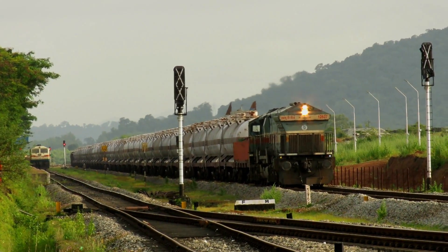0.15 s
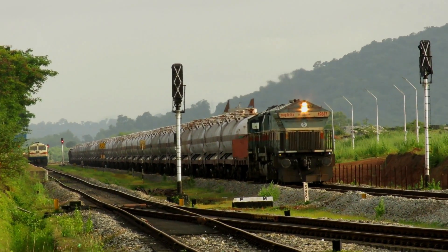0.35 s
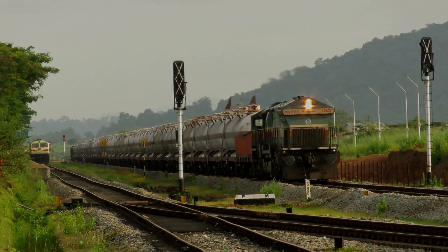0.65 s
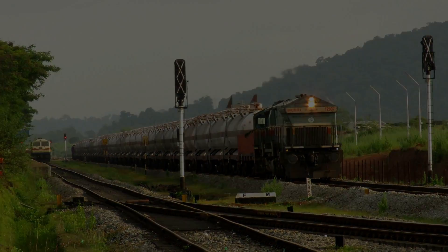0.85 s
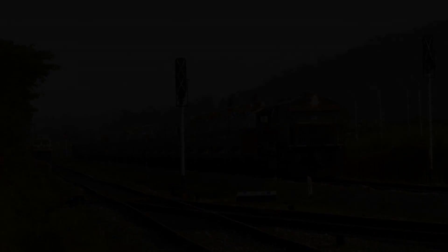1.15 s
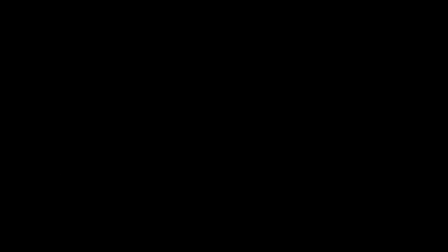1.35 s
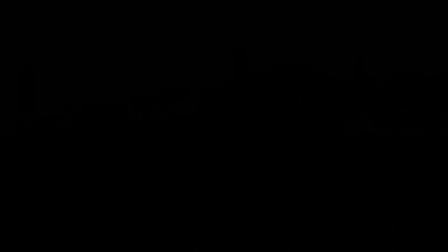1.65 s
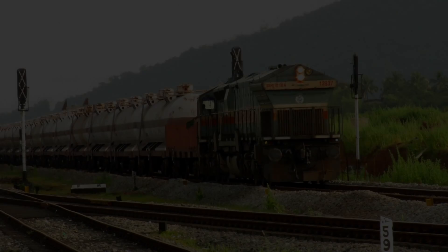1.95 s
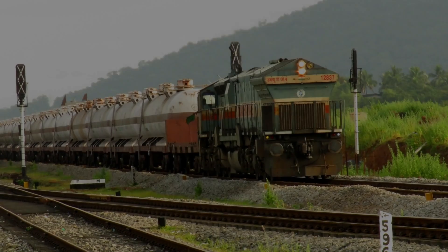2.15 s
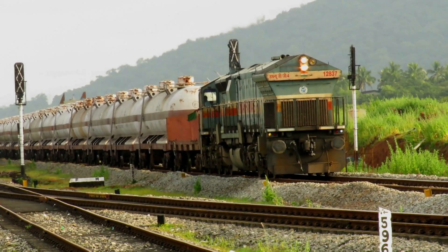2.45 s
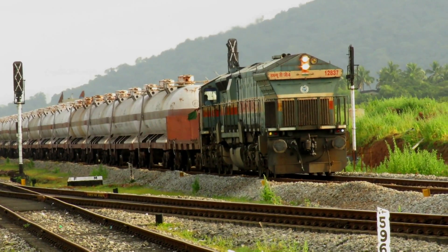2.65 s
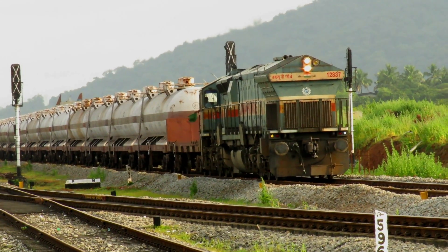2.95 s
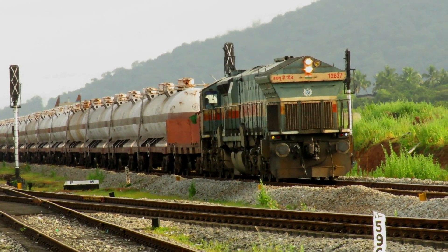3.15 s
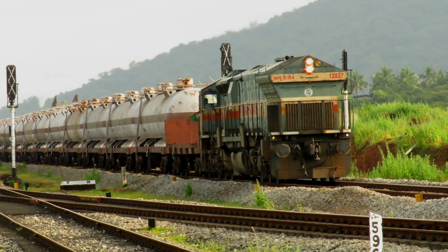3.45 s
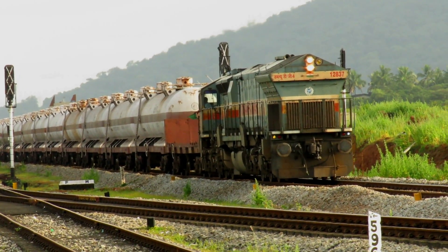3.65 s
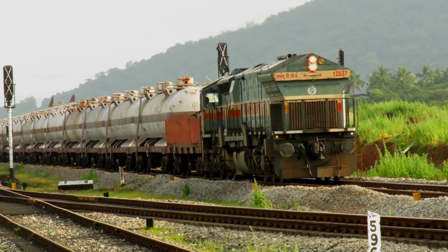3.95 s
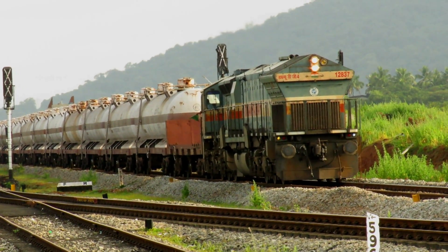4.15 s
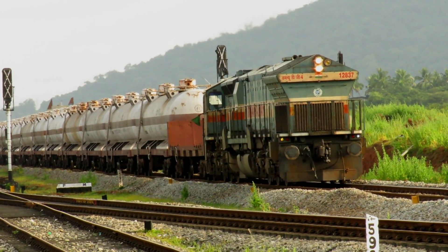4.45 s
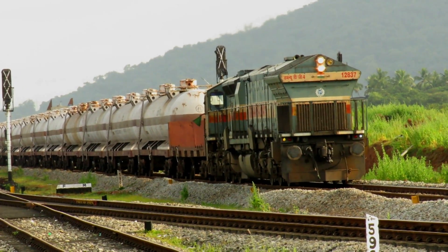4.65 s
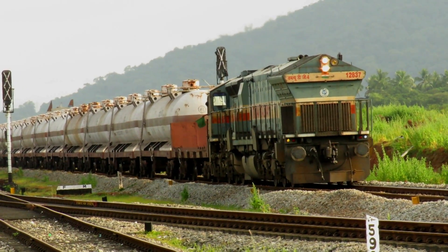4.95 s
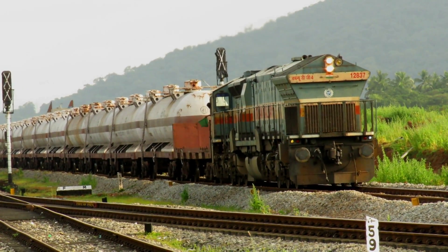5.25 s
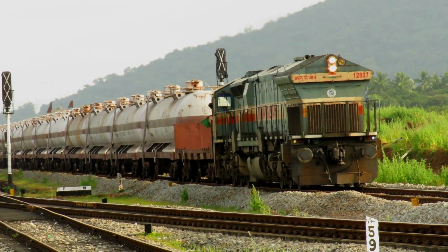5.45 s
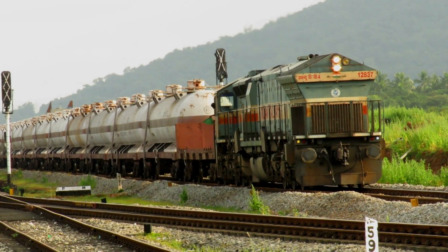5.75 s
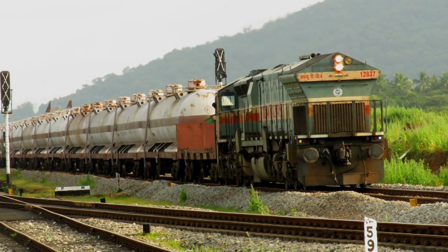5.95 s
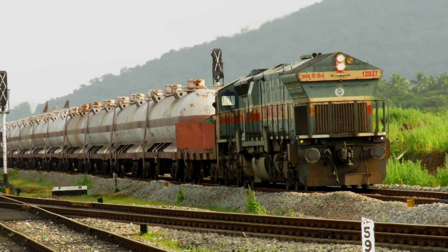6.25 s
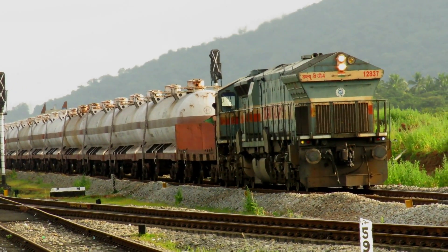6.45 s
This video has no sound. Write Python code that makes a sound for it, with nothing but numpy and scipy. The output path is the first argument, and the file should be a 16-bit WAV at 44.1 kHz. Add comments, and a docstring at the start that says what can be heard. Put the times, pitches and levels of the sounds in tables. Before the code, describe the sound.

A diesel locomotive throbs and clatters as it slowly hauls a freight train closer, with a whine rising near the end.

```python
"""Freight train across open ground

A two-stroke diesel locomotive hauls a freight train slowly towards a stereo microphone. Its exhaust
throbs and its cylinders clatter in a pattern that repeats with every crank turn; gears and
turbocharger whine, wheels hiss and loose fittings rattle. A distant position, with a gust of wind
on the microphone, dissolves into a nearer one, where the engine takes on load near the end."""
import sys
import numpy as np
from scipy import signal
from scipy.fft import rfft, irfft, next_fast_len
from scipy.io import wavfile
from scipy.ndimage import uniform_filter1d

SR = 44100
rng = np.random.default_rng(int(sys.argv[2]) if len(sys.argv) > 2 else 0)


def pcm_store(signal):
    """Save signal as 16-bit PCM."""
    levels = np.round(np.clip(np.atleast_2d(signal), -1, 1) * 32767)
    wavfile.write(sys.argv[1], SR, levels.astype(np.int16).T)


N = 291048
TIME, FREQS = np.arange(N) / SR, np.arange(N // 2 + 1) * SR / N
SIDES = np.array([[1], [-1]])  # left, right
DISSOLVE_START_S, DISSOLVE_LENGTH_S = .55, 1.7  # from the far position to the near one
LOAD_START_S, LOAD_RISE_S = 5.43, .27
FAR_WANDER_RAD, NEAR_WANDER_RAD = 1.1, .6  # tones wander more from afar, through more air


def from_db(db):
    """Decibels to gain."""
    return 10 ** (np.asarray(db) / 20)


def rms_one(x):
    """Scale to unit power."""
    return x / np.sqrt(np.mean(x ** 2) + 1e-20)


def in_time(rows):
    """Each column after the first, which is seconds, at every sample."""
    s, *columns = np.transpose(rows)
    return [np.interp(TIME, s, c) for c in columns]


def ramp(start_s, length_s):
    """A straight rise from 0 to 1."""
    return np.clip((TIME - start_s) / length_s, 0, 1)


def gains(points):
    """Rows of Hz and dB as a gain at every frequency."""
    hz, db = np.transpose(points)
    return from_db(np.interp(np.log(FREQS + 1e-3), np.log(hz), db))


def colour(x, points):
    """Shape x by a spectrum whose ends fall away; unit power."""
    skirts = 1 / (1 + (FREQS / points[-1][0]) ** 4) / (1 + (points[0][0] / (FREQS + 1e-3)) ** 4)
    return rms_one(irfft(rfft(x) * gains(points) * skirts, N))


def drift(rate_hz, step=40):
    """Slow random motion with spread 1, drawn every few samples and joined up."""
    size = next_fast_len(N // step + 2)
    hz = np.arange(size // 2 + 1) * SR / step / size
    slow = irfft(rfft(rng.standard_normal(size)) / (1 + (hz / rate_hz) ** 2), size)
    return np.interp(np.arange(N) / step, np.arange(size), rms_one(slow))


def tone(turns, order, wander, flutter_db, rough=0):
    """A sine at a multiple of a rotation, shaken by moving air; wander and rough are in radians."""
    phase = 2 * np.pi * (order * turns + rng.random()) + wander * drift(2.5)
    if rough:
        phase += rough * drift(35)
    return np.sqrt(2) * np.sin(phase) * from_db(flutter_db * drift(6))


def approach_s():
    """Seconds since the end of the dissolve, negative before it."""
    return TIME - DISSOLVE_START_S - DISSOLVE_LENGTH_S


def level(near, far_db, near_db, db_per_s, load_db):
    """Gain of a part: steady from afar; from nearby it follows the approach and the load."""
    if not near:
        return from_db(far_db)
    load = ramp(LOAD_START_S, LOAD_RISE_S)
    return from_db(near_db + db_per_s * np.maximum(approach_s(), 0) + load_db * load)


def outdoors(x, echo_s):
    """Direct sound at the microphone, plus a short spray of reflections off ground and cars."""
    # Each row: frequency in Hz, lead of the left channel in radians, left minus right in dB.
    stereo_image = [(60, 0, 0), (110, 0, -.2), (190, -.05, -1.3), (300, -.4, -2.5), (520, .6, -1),
                    (750, .35, 1.1), (1200, .5, 2.2), (1630, 1.1, 3), (2570, .9, -1), (4500, 0, 0)]
    # Each row: frequency in Hz, share that arrives scattered in dB.
    scatter = [(80, -32), (120, -22), (200, -16), (450, -12), (750, -19), (1150, -8), (1400, -13),
               (2000, -6)]
    hz, *columns = np.transpose(stereo_image)
    lead, balance_db = (np.interp(FREQS, hz, column) for column in columns)
    spray = rng.standard_normal(N) * np.exp(-TIME / echo_s) * (TIME < 10 * echo_s)
    scattered = gains(scatter) * rfft(spray) / np.sqrt(np.sum(spray ** 2))
    direct = from_db(SIDES * balance_db / 2) * np.exp(1j * SIDES * lead / 2)
    return irfft(rfft(x) * (direct + SIDES * scattered), N)


def hiss():
    """Wide, slightly unsteady hiss of air and rolling wheels, in which wheels and rails ring faintly."""
    # Each row: wheel or rail resonance in Hz, half width in Hz, dB relative to the hiss.
    rings = [(2090, 21, 1.5), (2620, 11, -2), (8480, 27, 0)]
    # Colour of the hiss. Each row: frequency in Hz, relative level in dB.
    spectrum = [(1500, 0.5), (2200, 4), (2600, 3), (3100, -0.5), (4800, -4.5), (6000, -8), (8400, -12),
                (9100, -13), (9700, -8.5), (10200, -12), (13000, -16), (16000, -19)]
    # Stereo width. Each row: frequency in Hz, side against mid in dB.
    side_gain = [(1500, -2.5), (2300, 5.5), (4400, 2.5), (6000, 0), (9000, 1), (11000, -19)]
    resonance = 1 + sum(from_db(db) / (1 + 1j * (FREQS - hz) / width) for hz, width, db in rings)
    rolling = irfft(rfft(rng.standard_normal((2, N))) * resonance, N)
    mid, side = colour(rolling, spectrum)
    side = irfft(rfft(side) * gains(side_gain), N)
    return (mid + side * SIDES) * from_db(.55 * drift(14))


def rattle(parts=48, touches_per_s=1000, t60_s=.035):
    """Loose fittings on the running gear: soft, uneven touches, each swelling briefly in one part."""
    # Colour of the rattle. Each row: frequency in Hz, gain in dB.
    spectrum = [(2200, 0), (2700, 0), (3300, -2), (4800, -2.5), (6000, -6), (7500, -9)]
    out = np.zeros((2, N))
    for hz in np.geomspace(2100, 7500, parts):
        when, force, place = rng.random((int(touches_per_s * N / SR / parts), 3)).T
        pan = np.array([np.cos(2 * np.pi * place), np.sin(2 * np.pi * place)])
        touches = np.full((2, N), 1e-18)
        touches[:, (when * N).astype(int)] = from_db(10 * force) * pan
        radius = from_db(-60 / (t60_s * SR))
        angle = 2 * np.pi * hz * (1 + .02 * rng.random()) / SR
        resonator = [0, np.sin(angle), 0.0036, 1, -2 * radius * np.cos(angle), radius * radius]
        out += signal.sosfilt([resonator] * 2, touches)  # two in series soften the attack
    return colour(out, spectrum)


def wind(low_cut_hz=38):
    """Wind on the microphone: dull eddies, brighter lumps as a puff hardens, single pressure kicks."""
    # Each row: crest of a puff in seconds, half length in seconds, level in dB.
    puffs = [(0.21, 0.087, -44), (0.566, 0.16, -40), (0.814, 0.04, -34.5), (0.914, 0.025, -34.5),
             (1.11, 0.13, -38), (1.35, 0.11, -39)]
    # Each row: moment of a sharp buffet in seconds, half width in seconds, strength in dB.
    buffets = [(.2, .0012, -27), (.46, .0012, -27), (.606, .0012, -23), (.714, .0025, -23),
               (.774, .0009, -24), (.784, .0012, -25), (.804, .0011, -21), (.813, .001, -24),
               (.837, .0012, -22.5), (.887, .0012, -22), (.897, .0015, -21), (.907, .0012, -21),
               (1.011, .0009, -24), (1.085, .0018, -20.5), (1.095, .0009, -23.5), (1.132, .0008, -21),
               (1.162, .001, -21), (1.214, .001, -24), (1.288, .001, -23), (1.428, .0012, -22)]
    # Colours of the lumps and of the eddies. Each row: frequency in Hz, relative level in dB.
    lump_spectrum = [(30, -22.5), (60, 8.5), (100, -1), (170, 2.5), (300, -6), (420, -14), (600, -20.5),
                     (1200, -36.5)]
    eddy_spectrum = [(40, -24), (70, -13), (110, -3), (190, -6), (260, -8.5), (400, -24.5)]
    power = sum(from_db(db) ** 2 * np.exp(-((TIME - s) / length) ** 2) for s, length, db in puffs)
    gust_db = 10 * np.log10(power + 1e-12)
    lump_db = gust_db + .35 * (gust_db - gust_db.max())  # lumps grow faster than the puff
    lump_gain = from_db(lump_db) * rms_one(from_db(2.3 * drift(86)))
    eddy_gain = from_db(gust_db * .5 - 21.5) * np.clip((gust_db + 63) / 10, 0, 1)
    lumps = colour(rng.standard_normal((2, N)), lump_spectrum) * lump_gain
    eddies = colour(rng.standard_normal((2, N)), eddy_spectrum) * eddy_gain
    mid, side = lumps + eddies
    for s, width_s, db in buffets:
        age = (TIME - s) / width_s
        mid = mid + from_db(db) * age * np.exp(-age ** 2)
    pressure = mid + from_db(-11.5) * side * SIDES
    return irfft(rfft(pressure) * FREQS ** 4 / (FREQS ** 4 + low_cut_hz ** 4), N)


def squeals():
    """Faint, thin whistles, probably from the wheels, that swell and die away."""
    # Each row: crest in seconds, half length in seconds, pitch in Hz, level in dB.
    whistles = [(2.1, .2, 4820, -92), (5.08, .14, 4815, -96), (5.8, .27, 4615, -90)]
    return sum(from_db(db) * np.exp(-((TIME - s) / length) ** 2)
               * tone(TIME, hz, wander=1.7, flutter_db=5, rough=1.2) for s, length, hz, db in whistles)


def turbocharger():
    """A thin, flickering whistle that only carries a short way and sags under load."""
    # Each row: time in seconds, pitch in Hz, level in dB.
    whistle = [(1.4, 5452, -105), (2, 5452, -93), (2.42, 5452, -84), (2.8, 5452, -91), (2.97, 5452, -83),
               (3.15, 5452, -85), (3.42, 5452, -92), (3.9, 5452, -86), (4.5, 5452, -97), (5, 5450, -96),
               (5.25, 5435, -90), (5.55, 5420, -90), (5.7, 5410, -82.5), (5.8, 5405, -89),
               (5.95, 5400, -86), (6.2, 5395, -91)]
    hz, db = in_time(whistle)
    flicker = from_db(db + 3 * drift(25))
    return flicker * tone(np.cumsum(hz) / SR, 1, wander=1.2, flutter_db=.8, rough=.75)


def sinking_hum(pitch_hz=171.8, sink_hz_per_s=7.3):
    """Three partials, probably the traction gears, gliding down through pitch_hz as the dissolve ends."""
    # Each row: multiple of the pitch, level in dB.
    partials = [(1, -53.5), (2, -53), (3, -62)]
    # The hum is clearest midway. Each row: time in seconds, gain in dB.
    swell = [(1.5, -3), (3.1, -4), (3.6, 1), (4.4, -1), (6.6, -3)]
    cycles = np.cumsum(pitch_hz - sink_hz_per_s * approach_s()) / SR
    hum = sum(from_db(db) * tone(cycles, order, wander=.56, flutter_db=2.5) for order, db in partials)
    return from_db(in_time(swell)[0]) * hum


def crank(speed, throb_s):
    """Crank angle in turns, zero on a throb; an order is a multiple of the crank's speed."""
    turns = np.cumsum(in_time(speed)[0]) / SR
    return turns - np.interp(throb_s, TIME, turns)


def turn_noise(turns, alike):
    """Noise of which a share comes back the same on every crank turn."""
    size = int(N / (turns[-1] - turns[0]))
    repeated = rng.standard_normal(size)[(turns % 1 * size).astype(int) % size]
    return np.sqrt(alike) * repeated + np.sqrt(1 - alike) * rng.standard_normal(N)


def whines(turns, near, gear_order=78.95):
    """Gears and pump, both driven by the crank."""
    gear = tone(turns, gear_order, wander=.2, flutter_db=1)
    octave = tone(turns, 2 * gear_order, wander=.3, flutter_db=1.2)
    pump_order, wander, rough = (113, NEAR_WANDER_RAD, 0) if near else (105.5, FAR_WANDER_RAD, .7)
    pump = tone(turns, pump_order, wander, flutter_db=2, rough=rough)
    return (gear * level(near, far_db=-65, near_db=-60.5, db_per_s=1, load_db=12.5)
            + octave * level(near, far_db=-70, near_db=-70.5, db_per_s=3, load_db=-2)
            + pump * level(near, far_db=-63, near_db=-70, db_per_s=1.6, load_db=-10))


def firing(turns, width=.25):
    """One exhaust pulse for each cylinder, some stronger than others."""
    # Strength in dB of the sixteen pulses of a turn, in firing order.
    cylinders_db = (-6, -4, -4, 1, -1, -9, 0, -2, -3, -1, 1.5, -4, -3, 0, -3, -3)
    beats = turns * len(cylinders_db)
    nearest = np.round(beats).astype(int)
    strength = from_db(cylinders_db)[nearest % len(cylinders_db)]
    return strength * np.exp(-((beats - nearest) / width) ** 2)


def knocking(turns, slip_turns=.005, spread_db=2.2):
    """Cylinder knocks around the turn, each a little off in force and time; load shifts their weight."""
    # Each row: turns after the throb, half width in turns, strength in dB, change under load in dB.
    knocks = [(.04, .02, -7, 0), (.13, .028, -9.5, 2), (.21, .04, -7, 4), (.33, .035, -12, 7),
              (.39, .015, -12, 4), (.44, .018, -9.5, 5), (.515, .024, -6.5, -3), (.71, .024, -5.5, 6),
              (.76, .014, -12, 0), (.815, .02, -10, 0), (.915, .045, -1.2, -2), (.995, .018, -4.2, -3)]
    load = ramp(LOAD_START_S, LOAD_RISE_S)
    loose_turns = turns + slip_turns * drift(30)
    pattern = np.zeros(N)
    for at, width, db, load_db in knocks:
        offset = (loose_turns - at + .5) % 1 - .5
        pattern += from_db(db + load_db * load) * np.exp(-(offset / width) ** 2)
    return pattern * from_db(spread_db * drift(45))


def clatter(turns, knocks):
    """The engine block's ringing, evened out, then driven by the run of knocks."""
    # Each row: crank order of a ring of the block, dB relative to the noise.
    block_rings = [(69, -6), (71, -14), (73, -7), (82, -17), (84, -17)]
    # Colour of the block's noise, and the band it radiates. Each row: frequency in Hz, gain in dB.
    spectrum = [(500, -36), (600, -16.5), (660, 3.5), (720, -2), (775, 4), (830, -1), (865, -4),
                (910, -3.5), (960, -21), (1100, -19.5), (1600, -34.5)]
    block_band = [(400, -14.5), (590, -4), (655, 1.5), (800, 1.5), (910, 1.5), (970, -7.5), (1600, -4)]
    rings = sum(from_db(db) * tone(turns, order, wander=.25, flutter_db=1.5) for order, db in block_rings)
    ringing = colour(turn_noise(turns, alike=.45), spectrum) + rings
    ringing /= np.sqrt(uniform_filter1d(ringing ** 2, size=500) + .15)
    return colour(ringing * (1 + 2.8 * knocks), block_band)


def machinery(turns, near):
    """Gas and metal in stack, block and fan housing, timed by knocks and firings, over humming panels."""
    # Colours of the low rumble and of the exhaust roar. Each row: frequency in Hz, relative level in dB.
    rumble_spectrum = [(25, -15), (38, -17), (52, 5), (100, 3.5), (160, -1.5), (200, -3.5), (320, -7),
                       (400, -8), (450, -14), (490, -15), (522, -15), (548, -11), (575, -16), (800, -30.5)]
    roar_spectrum = [(700, 2.5), (1020, -0.5), (1130, -2.5), (1240, -5.5), (1330, -3), (1410, -0.5),
                     (1500, -0.5), (1600, -9.5), (1930, -11), (2150, -25.5), (3000, -33)]
    # Rings of the engine panels and of the fan housing. Each row: crank order, relative level in dB.
    panel_rings = [(13, -7), (17, -6), (23, -10), (30, -10), (34, -11), (44, -13), (51, -18), (57, -16)]
    housing_rings = [(141, -3), (142, -3), (144, 0), (146, -1), (149, -1), (151, -3)]
    knocks = knocking(turns)
    pulses = 1 + .7 * firing(turns)
    rumble = colour(turn_noise(turns, alike=.2) * (1 + .12 * knocks), rumble_spectrum)
    panels = sum(from_db(db) * tone(turns, order, wander=.57, flutter_db=1.5)
                 for order, db in panel_rings)
    roar = colour(turn_noise(turns, alike=.2) * pulses, roar_spectrum)
    housing = pulses * sum(from_db(db) * tone(turns, order, wander=1.4, flutter_db=3.5)
                           for order, db in housing_rings)
    block = clatter(turns, knocks)
    return (rumble * level(near, far_db=-43.5, near_db=-39.5, db_per_s=.1, load_db=1.4)
            + panels * level(near, far_db=-55.5, near_db=-48, db_per_s=.62, load_db=-1.5)
            + block * level(near, far_db=-55.5, near_db=-46, db_per_s=.72, load_db=-4)
            + roar * level(near, far_db=-59, near_db=-54.5, db_per_s=.12, load_db=-.7)
            + housing * level(near, far_db=-82.5, near_db=-70, db_per_s=.33, load_db=1))


def boom(turns, near, orders=(6, 7, 8, 9), trim_db=-.24, swell_db=.55):
    """Exhaust throb: neighbouring low orders swell together once a turn; under load they stray more."""
    # Level in dB of each of the four orders from afar.
    far_levels = (-47.5, -50, -38.5, -47)
    # From nearby. Each row: time in seconds, then the level in dB of each order.
    near_levels = [(1.5, -52, -50, -33, -47), (1.85, -52.5, -44.5, -33.0, -41.0),
                   (2.15, -53.5, -40.0, -33.0, -36.0), (2.45, -49.0, -38.0, -32.5, -38.5),
                   (2.7, -50.0, -40.0, -32.0, -37.5), (2.95, -55.0, -38.0, -30.0, -40.0),
                   (3.15, -53.5, -36.0, -30.5, -42.0), (3.42, -54.5, -41.0, -31.0, -45.0),
                   (3.7, -53.0, -41.0, -30.0, -39.5), (3.95, -53.0, -38.0, -31.5, -41.0),
                   (4.2, -53.5, -37.0, -30.5, -41.0), (4.38, -50.0, -36.5, -33.5, -45.5),
                   (4.58, -50.0, -38.0, -32.5, -49.0), (4.8, -55.5, -40.5, -36.0, -46.0),
                   (5.05, -50.5, -36.0, -30.5, -51.0), (5.35, -44.5, -37.5, -38.0, -47.5),
                   (5.6, -48.5, -37.5, -35.0, -46.5), (5.8, -53.0, -39.5, -34.0, -42.0),
                   (6.1, -50.5, -42.0, -36.0, -42.0), (6.5, -52.0, -49.0, -36.5, -41.5)]
    levels_db = in_time(near_levels) if near else far_levels
    stray_rad = .16 + .16 * ramp(LOAD_START_S, LOAD_RISE_S)
    throb = sum(from_db(db) * np.cos(2 * np.pi * order * turns + stray_rad * drift(3))
                for order, db in zip(orders, levels_db))
    return np.sqrt(2) * throb * from_db(trim_db + swell_db * drift(9.1))


def locomotive(turns, near):
    """Everything that the crank drives, and the tones heard from one position only."""
    engine = boom(turns, near) + machinery(turns, near) + whines(turns, near)
    if near:
        return engine + turbocharger() + squeals() + sinking_hum()
    far_hum = from_db(-61.5) * tone(turns, order=59, wander=FAR_WANDER_RAD, flutter_db=2)
    return engine + far_hum


def scene():
    """The far position gives way to the near one in a straight crossfade, so the level dips midway."""
    # Crank speed at each position; load drags it down. Each row: time in seconds, turns per second.
    far_speed = [(0, 9.76), (6.6, 9.76)]
    near_speed = [(0, 9.63), (2, 9.597), (5.3, 9.595), (5.6, 9.51), (6.6, 9.51)]
    fade = ramp(DISSOLVE_START_S, DISSOLVE_LENGTH_S)
    train = (1 - fade) * locomotive(crank(far_speed, throb_s=.516), near=False)
    train += fade * locomotive(crank(near_speed, throb_s=3.065), near=True)
    air = from_db(-73) * np.hypot(1 - fade, fade) * hiss()
    fittings = np.hypot((1 - fade) * from_db(-80.5), fade * from_db(-76.5)) * rattle()
    gust = wind() * from_db(-.8 * SIDES)  # a little stronger on the right
    return outdoors(train, echo_s=.043) + gust + air + fittings


def record(dry):
    """The top is cut steeply above 15750 Hz."""
    return signal.sosfilt(signal.ellip(10, .1, 80, 15750, fs=SR, output="sos"), dry)


dry = scene()
out = record(dry)
pcm_store(out)
```